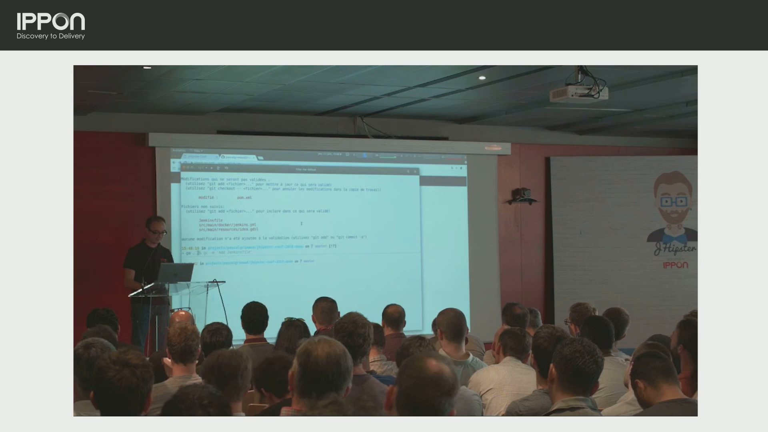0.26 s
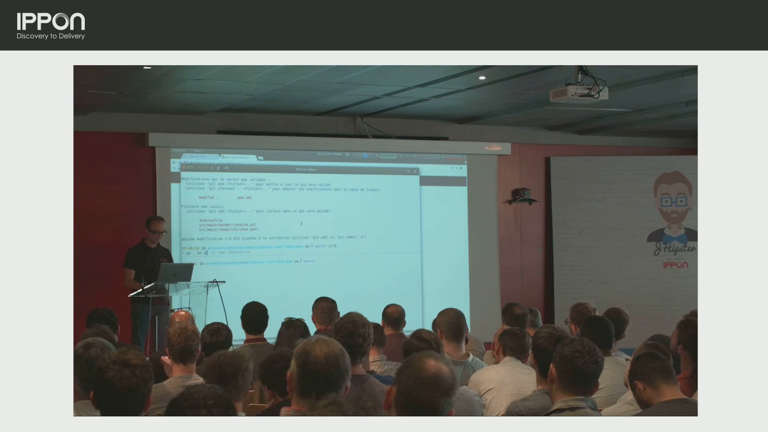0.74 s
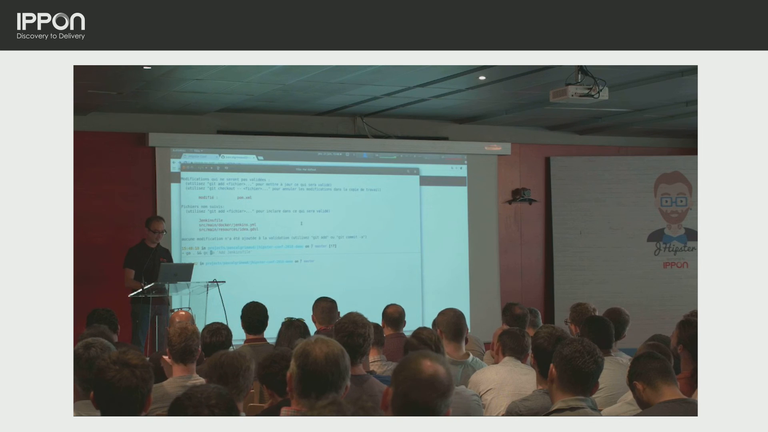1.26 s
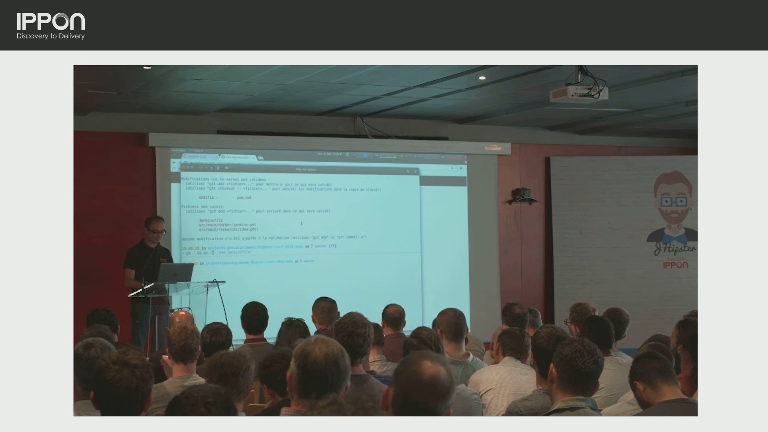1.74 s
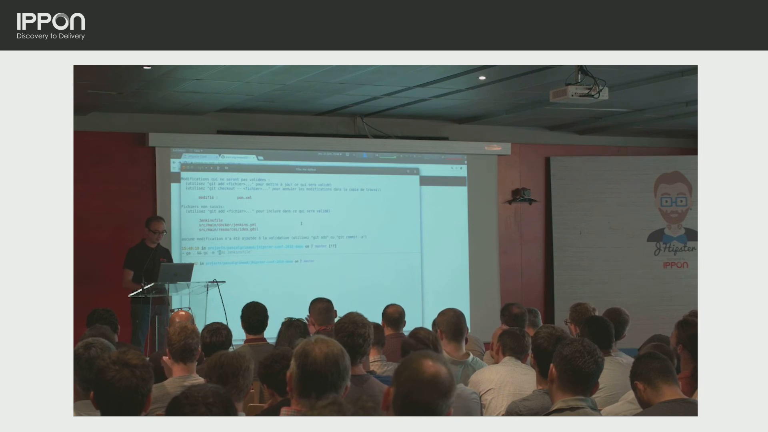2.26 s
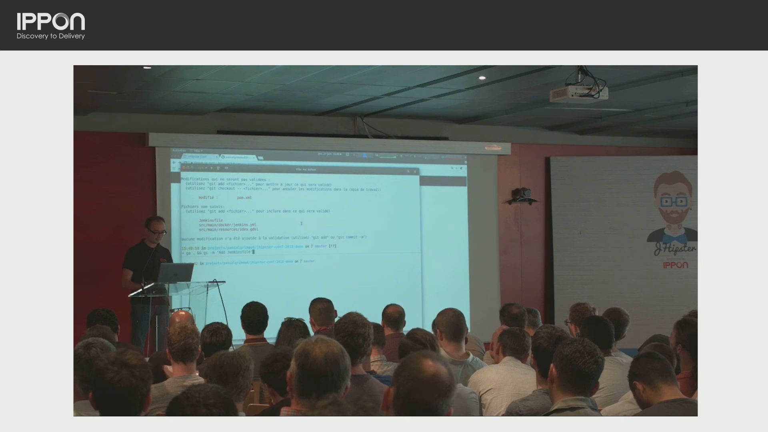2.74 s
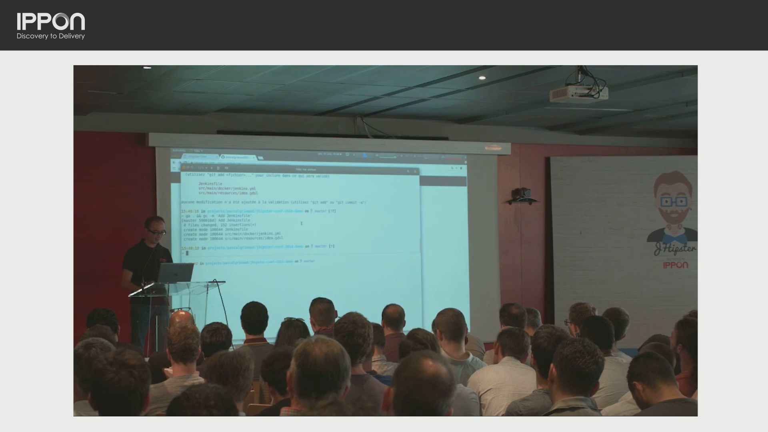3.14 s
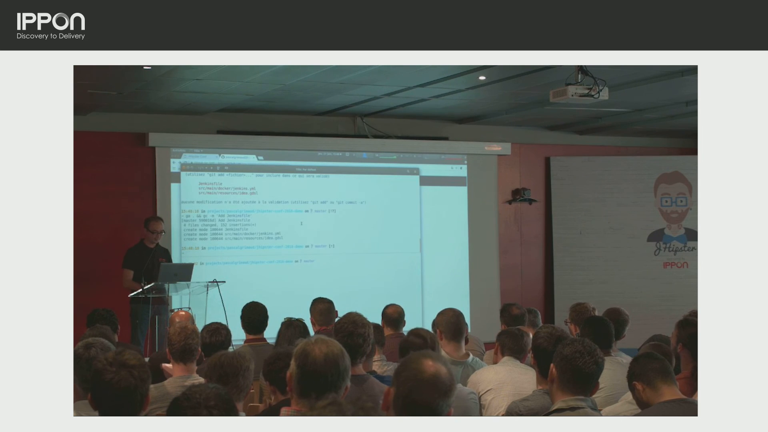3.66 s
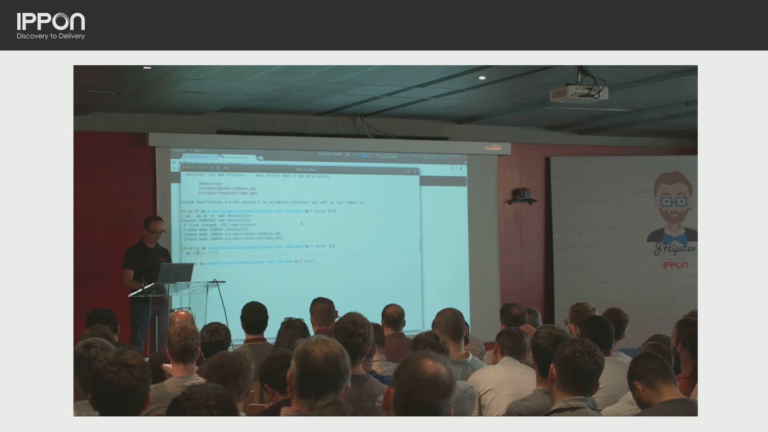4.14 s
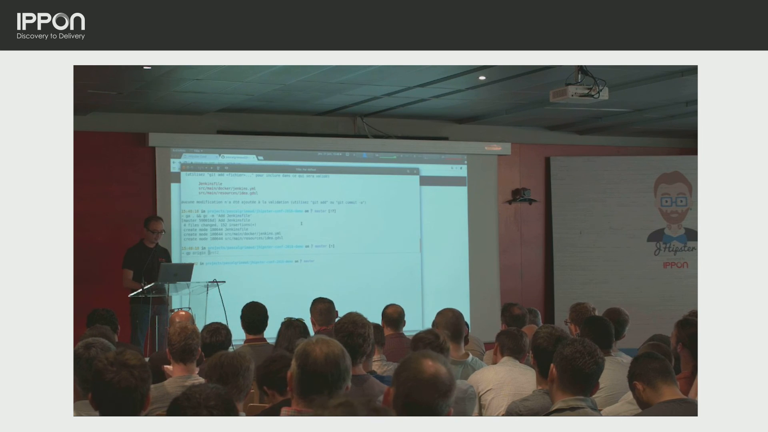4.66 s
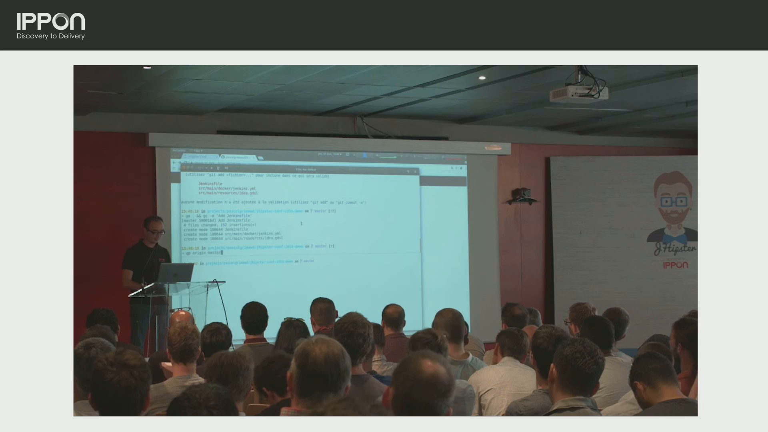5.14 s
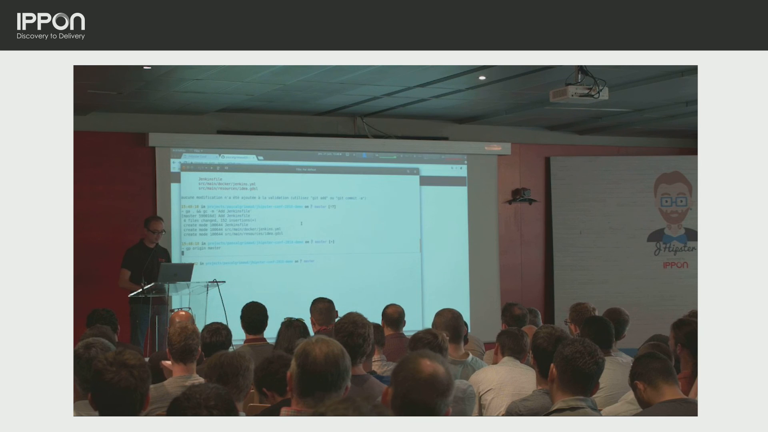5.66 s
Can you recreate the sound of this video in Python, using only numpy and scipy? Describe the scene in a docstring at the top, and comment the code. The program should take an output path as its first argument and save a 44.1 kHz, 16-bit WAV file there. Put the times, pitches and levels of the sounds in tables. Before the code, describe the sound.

A person types on a laptop resting on a lectern in a hall, picked up by a microphone fixed to the stand. Keystrokes come through mainly as dull, low knocks with faint thin clicks over an uneven hollow drone. A quick run opens, turns sparse after a second, nearly stops around three seconds, then returns dense and loudest before thinning.

```python
"""Typing on a laptop at a lectern in a hall, heard by a microphone fixed to the lectern.
From the start a filtered-noise drone comes and goes under a quick run of keystrokes: dull gliding knocks,
a slow sway of the stand and thin clicks in patchy narrow bands; low hollow clicks and short hums soon join in.
After about 1 s the typing turns sparse, then pauses near 3 s; from 3.5 s it is dense and loudest, and it thins
out again after 5.2 s. Whenever the level sinks, a gate lowers the sound and dulls the faint hiss."""
import sys
import numpy as np
from scipy import signal
from scipy.fft import rfft, irfft, next_fast_len
from scipy.io import wavfile
from scipy.ndimage import uniform_filter1d

SR = 44100
rng = np.random.default_rng(int(sys.argv[2]) if len(sys.argv) > 2 else 0)


def volts_from_decibels(level):
    """Turn decibel levels (scalar or array-like) into linear amplitude factors."""
    exponent = np.asarray(level, float) / 20
    return 10 ** exponent


def bounce(signal):
    """Save signal as a 16-bit WAV file at the path given by the first command-line argument."""
    frames = np.transpose(np.atleast_2d(signal))
    limited = np.clip(frames, -1, 1)
    pcm = np.round(limited * 32767).astype(np.int16)
    wavfile.write(sys.argv[1], SR, pcm)


N = 260013

# keystrokes thumping the lectern, before its body colours them:
# (time of the peak [s], level [dB], pitch at the peak [Hz], length scale [ms], sway level [dB])
KEY_KNOCKS = [(0.019, -54, 153.3, 50, -69), (0.045, -54, 100.3, 40, -55), (0.071, -57, 157, 21, -58),
              (0.141, -50.5, 108.8, 32, -53.5), (0.204, -51.5, 121.2, 24, -65.5),
              (0.285, -48.5, 102.6, 20, -50), (0.323, -40, 145.6, 39.4, -49),
              (0.401, -45, 123.2, 32, -43.5), (0.431, -48, 97.8, 26, -53), (0.507, -43.5, 153, 16.7, -60.5),
              (0.569, -59, 149.2, 9.9, -57), (0.615, -39.5, 109, 27, -56), (0.68, -40, 152.3, 34, -57.5),
              (0.725, -43.5, 160.1, 12, -59.5), (0.762, -48, 137.9, 35, -70),
              (0.815, -61.5, 177, 21, -59.5), (0.862, -44.5, 89, 25, -53.5),
              (0.888, -55.5, 105.3, 37, -51.5), (0.928, -57.5, 69, 64, -53.5),
              (1.214, -75.5, 153, 25, -101), (1.452, -39.5, 138, 18.5, -60.5), (1.542, -49.5, 163, 35, -66),
              (1.574, -62.5, 133, 18, -66), (1.742, -39, 127.5, 33, -67.5), (1.86, -39, 117.5, 27, -61),
              (1.92, -46.5, 154, 25, -60), (1.981, -52, 119.3, 22, -61), (2.013, -59.5, 84, 21, -59.5),
              (2.139, -46.5, 120, 16, -58), (2.185, -59.5, 85, 19, -64), (2.223, -56.5, 121, 36, -68.5),
              (2.341, -45.5, 118, 28, -65.5), (2.438, -54, 106, 37, -66), (2.586, -47.5, 134.5, 18, -59.5),
              (2.639, -49.5, 121.4, 25, -61), (2.842, -59, 140, 28, -79), (3.478, -42.5, 159.3, 10.8, -59),
              (3.503, -48.5, 88, 67, -57), (3.605, -44.5, 155.3, 22, -53.5), (3.729, -40.5, 147, 52, -58.5),
              (3.81, -59.5, 155.5, 54, -56.5), (3.844, -47, 127, 48, -56), (3.87, -39, 146.2, 26.4, -51),
              (3.947, -43, 99.2, 24.5, -54.5), (3.989, -44.5, 138.3, 25, -59.5), (4.039, -55, 132, 51, -59),
              (4.06, -38.5, 160, 28, -52), (4.094, -44, 107, 14, -49.5), (4.157, -38.5, 144, 41, -59),
              (4.218, -46.5, 129.5, 27, -64), (4.27, -37, 171.3, 24, -43.5), (4.369, -45.5, 88.4, 67, -60),
              (4.44, -56, 95, 32, -57), (4.471, -37.5, 145.6, 45, -59), (4.547, -41, 110, 17, -54.5),
              (4.592, -37.5, 123.6, 40, -52.5), (4.619, -45, 118.6, 8.3, -56),
              (4.674, -53.5, 113, 37, -55.5), (4.743, -44, 119, 49, -49), (4.795, -51.5, 73, 50, -45.5),
              (4.842, -36.5, 160.6, 19, -48), (4.927, -50.5, 117.8, 12, -66.5),
              (4.971, -40.5, 118.8, 30, -58.5), (5.016, -47, 107.8, 23, -74.5),
              (5.087, -46.5, 117.6, 41, -62.5), (5.148, -52, 139, 22, -65), (5.348, -66.5, 89, 43, -62),
              (5.469, -73, 97, 24, -72.5), (5.557, -44, 114, 33, -54), (5.603, -43.5, 120, 25, -64),
              (5.67, -47.5, 143, 30, -51.5), (5.734, -49.5, 119, 16.5, -56.5),
              (5.811, -68, 128.5, 28, -61.5)]


def evened(x):
    """Scales to rms 1."""
    return x / np.sqrt(np.mean(x ** 2) + 1e-30)


def add(mix, s, sound):
    """Mixes a sound in at time s, trimming whatever falls outside."""
    at = round(s * SR)
    sound = sound[max(-at, 0):]
    part = mix[max(at, 0):][:len(sound)]
    part += sound[:len(part)]


def hump(f, hz, width):
    """A steep-sided resonance: a Gaussian gain around hz."""
    return np.exp(-2 * ((f - hz) / width) ** 2)


def swell(t, rise, order=2):
    """Soft rise to 1 at t = rise, then an exponential fall; a higher order is narrower."""
    u = t / rise
    return (u * np.exp(1 - u)) ** order


def filtered(x, gain):
    """Applies gain(Hz) to a whole signal without shifting its phase."""
    size = next_fast_len(len(x) + 8192)
    return irfft(rfft(x, size) * gain(np.fft.rfftfreq(size, 1 / SR)), size)[:len(x)]


def coloured_noise(gain):
    """White noise shaped by gain(Hz), at rms 1."""
    return evened(filtered(rng.standard_normal(N), gain))


def causal(gain, floor_db=-50):
    """Adds the minimum phase that keeps a filter from ringing before its hit."""
    log = np.log(gain + gain.max() * volts_from_decibels(floor_db))
    ceps = irfft(log)
    ceps[1:len(log) - 1] *= 2
    ceps[len(log):] = 0
    return gain * np.exp(1j * rfft(ceps).imag)


def hiss(level_db=-96.5):
    """Faint steady hiss: noise shaped by a smooth spectrum, before the gate."""
    # spectrum of the hiss: (frequency [Hz], relative level [dB])
    spectrum = [(500, 3.5), (1500, -1), (3000, -3.5), (6000, -5), (9300, -4), (10000, -28.5)]
    hz, db = np.transpose(spectrum)
    return volts_from_decibels(level_db) * coloured_noise(lambda f: volts_from_decibels(np.interp(f, hz, db)))


def stirred(rise_s=0.0064, fall_db_per_s=121):
    """Envelope of the hall's answer to the knocks: each one rises fast and dies away evenly in dB."""
    stir, after = np.zeros(N), np.arange(SR // 2) / SR
    for s, db, *_ in KEY_KNOCKS:
        add(stir, s - rise_s, np.minimum(after / rise_s, 1) * volts_from_decibels(db - fall_db_per_s * after))
    return stir


def drone(patchy_db=4.0, patch_hz=7.0, bed_db=-16, lumpy_db=3.0, lump_hz=16.0):
    """Noise in hollow resonances, each swelling and sinking by itself, over a low rumble; knocks stir it up."""
    # drone over time: (time [s], low part level [dB], middle part against low [dB], top part against low [dB])
    course = [(0.0, -65.5, -3, -35.5), (0.284, -67, -26.5, -32.5), (0.419, -66.5, -20, -44),
              (0.551, -66.5, -4.5, -34), (0.758, -59, -23.5, -31.5), (0.97, -64, -13.5, -38),
              (1.029, -63, -11.5, -19), (1.121, -71.5, -7, -23), (1.17, -85, -8.5, -15.5),
              (1.411, -84.5, -5.5, -24.5), (1.45, -66.5, -22, -32.5), (1.6, -69, -6, -23.5),
              (1.77, -55, -25.5, -50.5), (1.92, -66, -10.5, -22.5), (2.2, -81.5, 1, -19.5),
              (2.36, -62.5, -16, -36), (2.43, -75, -3.5, -28), (2.53, -62.5, -21, -34),
              (2.78, -58.5, -21, -35), (2.93, -60.5, -19, -38), (3.04, -71.5, -23.5, -30),
              (3.18, -60.5, -23.5, -39), (3.4, -69.5, 0, -28), (3.87, -60, -28, -41), (4.2, -65.5, -8, -32),
              (4.32, -58, -19, -39.5), (4.42, -66.5, -9, -25), (4.571, -63.5, -18.5, -35),
              (4.8, -66, -18, -20.5), (5.01, -72.5, -1, -19), (5.09, -62.5, -11, -37),
              (5.3, -82.5, -16, -15.5), (5.37, -64.5, -20.5, -35.5), (5.45, -80.5, -6.5, -24.5),
              (5.561, -68.5, -21.5, -35), (5.9, -71.5, -19, -31)]
    # hollow resonances of the drone: (frequency [Hz], width [Hz], level within its part before levelling [dB])
    hollows = [(147, 14, -9), (189.6, 6, -3), (243, 29, 2), (328.2, 30, -6), (371.5, 66, -15.5),
               (435.4, 19, -4), (475, 27, 1), (472, 21, -6.5), (530.6, 43, -3.5), (602, 35, -16.5),
               (690, 54, 2.5), (802, 33, -1), (861, 56, -5)]
    s, low_db, middle_db, top_db = np.transpose(course)
    t = np.arange(N) / SR
    parts = np.zeros((3, N))  # low, middle, top
    for hz, width, db in hollows:
        ring = coloured_noise(lambda f: 1 / (1 + ((f - hz) / width) ** 2) ** 2)
        patch = coloured_noise(lambda f: hump(f, 0, patch_hz))
        part = int(hz > 410) + int(hz > 650)
        parts[part] += volts_from_decibels(db + patchy_db * patch) * ring
    parts[0] += volts_from_decibels(bed_db) * coloured_noise(lambda f: hump(f, 87, 61))
    parts /= np.sqrt(uniform_filter1d(parts ** 2, 8000, axis=1)) + 1e-12  # steady slow level
    parts *= volts_from_decibels(lumpy_db * coloured_noise(lambda f: hump(f, 0, lump_hz)))  # lumps shared by all parts
    stir = stirred()
    out = np.zeros(N)
    stir_levels_db = (-24, -44.5, -61)  # against the knock
    for part, db, stir_db in zip(parts, (0, middle_db, top_db), stir_levels_db):
        out += part * np.hypot(volts_from_decibels(np.interp(t, s, low_db + db)), volts_from_decibels(stir_db) * stir)
    return out


def knocks(glide=0.11, rise_share=0.42, rumble_db=-8, rumble_rise_s=0.018, rumble_hz=100, stiff_hz=58):
    """A few cycles that sag in pitch and a murky after-rumble, coloured by the lectern top."""
    # resonances and one dip of the lectern top: (frequency [Hz], width [Hz], gain [dB])
    top_modes = [(80.8, 19, 4), (101.2, 9.9, 3.5), (133, 24, -3.5), (160, 66, 5), (185.6, 37, 4)]
    out, t = np.zeros(N), np.arange(8820) / SR
    for s, db, hz, ms, _ in KEY_KNOCKS:
        rise = rise_share * ms / 1000
        from_peak = t - rise
        turns = hz * from_peak * (1 - glide * np.tanh(from_peak / rise)) + rng.random()
        add(out, s - rise, volts_from_decibels(db) * swell(t, rise, order=4) * np.cos(2 * np.pi * turns))
        noise = rng.standard_normal(len(t))
        rumble = evened(filtered(noise, lambda f: hump(f, rumble_hz, 76)))
        add(out, s, volts_from_decibels(db + rumble_db) * swell(t, rumble_rise_s) * rumble)
    out = filtered(out, lambda f: volts_from_decibels(sum(db * hump(f, hz, w) for hz, w, db in top_modes)))
    return filtered(out, lambda f: 1 / (1 + (stiff_hz / (f + 1)) ** 6))  # the top is too stiff to ring lower


def sway(sway_hz=52.5, rise_s=0.045):
    """Each keystroke rocks the stand: a low sine that swells and dies away."""
    out, t = np.zeros(N), np.arange(8820) / SR
    for s, *_, db in KEY_KNOCKS:
        turns = sway_hz * t + rng.random()
        add(out, s - .02, volts_from_decibels(db) * swell(t, rise_s, order=3) * np.sin(2 * np.pi * turns))
    return out


def muffled(x, muffle_hz=450):
    """The lectern passes only the low end of knocks and sway."""
    return filtered(x, lambda f: 1 / (1 + (f / muffle_hz) ** 4))


def tick_shape(t, tick_s=0.0018, echo_s=0.0077, echo_db=-4, tail_db=-11, tail_t60=0.24):
    """Envelope of a tick, its echo off the lectern top and a short hall tail."""
    shape = swell(np.maximum(t, 0), tick_s)
    shape += volts_from_decibels(echo_db) * swell(np.maximum(t - echo_s, 0), tick_s)
    fade_in = np.clip(t / 0.00067, 0, 1)
    fade_out = np.clip((.13 - t) / 0.042, 0, 1)
    return shape + volts_from_decibels(tail_db - 60 * t / tail_t60) * fade_in * fade_out


def struck(hits, snap_db=17, boost_db=5, patches_low_hz=1700, uneven_db=7, narrow=0.65, thin_db=5, thin_width=300):
    """Snap and noisy tick in a combed main band, plus patchy bands of strengths drawn anew for each hit."""
    # key deck resonances that comb every hit: (frequency [Hz], width in the comb [Hz], gain [dB])
    deck_modes = [(1200, 150, 14.5), (1960, 87, 8), (2920, 220, 18), (3686, 350, 20.5), (4540, 500, 21.5),
                  (5094, 120, 14.5), (5610, 640, 15.5), (6500, 550, 15), (7060, 410, 18), (7850, 320, 15.5),
                  (8440, 990, 16.5), (9490, 730, 16), (10060, 790, 20.5), (11150, 800, 23.5),
                  (12100, 740, 21.5)]
    size = 8192
    out, t, f = np.zeros(N), np.arange(size) / SR - .01, np.fft.rfftfreq(size, 1 / SR)
    comb = volts_from_decibels(sum(db * hump(f, hz, w) for hz, w, db in deck_modes))
    bands = np.array([volts_from_decibels(db) * hump(f, hz, narrow * w) for hz, w, db in deck_modes])
    bands /= 1 + (patches_low_hz / (f + 1)) ** 6  # low cut
    shape = tick_shape(t)
    snap = volts_from_decibels(snap_db) * (np.arange(size) == round(.012 * SR))  # one sample
    for s, db, hz, spread, patches_db, thin_hz in hits:
        share = volts_from_decibels(uneven_db * rng.standard_normal(len(deck_modes)))
        patches = evened(share @ bands) + volts_from_decibels(thin_db) * evened(hump(f, thin_hz, thin_width))
        main = evened(comb * hump(f, hz, 0.52 * spread))
        colour = volts_from_decibels(db) * main + volts_from_decibels(patches_db) * patches
        burst = rng.standard_normal(size) * shape + snap
        add(out, s - .0125, volts_from_decibels(boost_db) * irfft(rfft(burst) * causal(colour)))
    return out


def clicks():
    """Thin clicks of the key caps, each heard in a main band, patchy bands and one narrow band."""
    # clicks, levels before the shared boost: (time [s], level [dB], main band centre [Hz],
    # main band spread before narrowing [Hz], level of the patchy bands [dB], narrow band centre [Hz])
    cap_clicks = [(0.01, -77.5, 5800, 3120, -93.5, 3820), (0.031, -79.5, 5760, 3040, -102, 1630),
                  (0.306, -78.5, 6010, 690, -102, 4930), (0.382, -93, 9230, 450, -105, 8560),
                  (0.604, -93, 10680, 508, -108, 4730), (0.658, -69, 6500, 6200, -90.5, 2170),
                  (0.666, -69, 5050, 4100, -79, 2910), (0.79, -75, 6180, 2600, -95.5, 7100),
                  (0.842, -83, 8600, 1030, -100, 7000), (1.014, -73.5, 3373, 440, -100, 1580),
                  (1.785, -77, 4980, 1490, -89, 6910), (1.915, -87.5, 5750, 1780, -97.5, 11790),
                  (2.13, -100, 11150, 370, -108, 8750), (2.572, -70.5, 6400, 1800, -81, 2730),
                  (2.575, -76, 9450, 5590, -88, 1994), (2.626, -71, 8330, 1870, -90.5, 10650),
                  (3.711, -86.5, 4480, 990, -97.5, 5230), (4.045, -83, 8850, 541, -100, 1330),
                  (4.137, -92.5, 8800, 612, -100, 875), (4.196, -79.5, 9010, 551, -98.5, 9700),
                  (4.257, -80, 5140, 690, -90.5, 9370), (4.332, -73, 5600, 2420, -76, 4400),
                  (4.34, -78, 9810, 4800, -95, 2806), (4.451, -88, 8500, 870, -96.5, 11440),
                  (4.723, -95, 9820, 444, -105, 8770), (4.816, -80, 10260, 1800, -91, 6500),
                  (4.817, -90.5, 4580, 400, -93.5, 5600), (5.053, -68.5, 10420, 2400, -85, 7850),
                  (5.055, -78, 6100, 1414, -91.5, 2890), (5.593, -83.5, 4030, 454, -92.5, 7200)]
    return struck(cap_clicks)


def low_clicks():
    """Low hollow clicks and short hums: mostly lower bands, shaped like the thin clicks."""
    # low clicks and hums, levels before the shared boost: (time [s], level [dB], band centre [Hz],
    # band spread before narrowing [Hz])
    hollow_clicks = [(0.501, -77, 497, 197), (0.551, -83, 504, 201), (0.66, -77.5, 713, 440),
                     (0.662, -87, 1200, 250), (1.014, -65.5, 720, 250), (1.961, -83, 525, 202),
                     (2.303, -85, 524, 200), (2.393, -87, 1240, 300), (3.36, -74, 500, 160),
                     (3.4, -76, 489, 120), (3.956, -75, 1010, 370), (4.364, -58.5, 541, 176),
                     (4.723, -79, 776, 504), (4.817, -73, 748, 500), (4.821, -62.5, 1390, 833),
                     (5.468, -72, 485, 146), (5.593, -77, 1536, 420)]
    return struck([row + (-200, 1000) for row in hollow_clicks])  # -200 dB: no audible patchy bands


def scene():
    """Drone, knocks, sway, thin clicks and low clicks at one microphone."""
    return (drone() + muffled(knocks() + sway()) + clicks() + low_clicks())[None]


def gated(x, noise, open_db=-69, knee_db=2.0, shut_hz=4000, shut_db=-5, memory_s=0.012):
    """A level follower drives a soft gate that lowers the sound and dulls the hiss when the level sinks."""
    keep = np.exp(-1 / (memory_s * SR))
    power = signal.lfilter([1 - keep], [1, -keep], x ** 2)
    level_db = 10 * np.log10(power + 1e-14)
    gate = 1 / (1 + np.exp((open_db - level_db) / knee_db))  # 1 open, 0 shut
    gate = uniform_filter1d(gate, size=200, axis=1)
    dull = filtered(noise, lambda f: 1 / (1 + (f / shut_hz) ** 2))
    return x * volts_from_decibels(shut_db * (1 - gate)) + gate * noise + (1 - gate) * dull


def band_limit(x):
    """A steep low-pass at the top of the band."""
    return signal.sosfilt(signal.butter(12, 11950, fs=SR, output="sos"), x)


def record(dry):
    """A low cut at 42 Hz, then hiss and gate."""
    low_cut = signal.butter(4, 42, "high", fs=SR, output="sos")
    cut = signal.sosfilt(low_cut, dry)
    mix = gated(cut, hiss())
    return band_limit(mix)


dry = scene()
out = record(dry)
bounce(out)
```